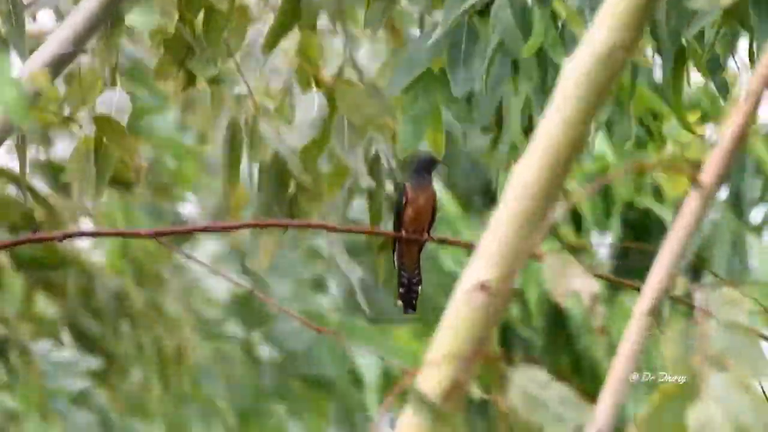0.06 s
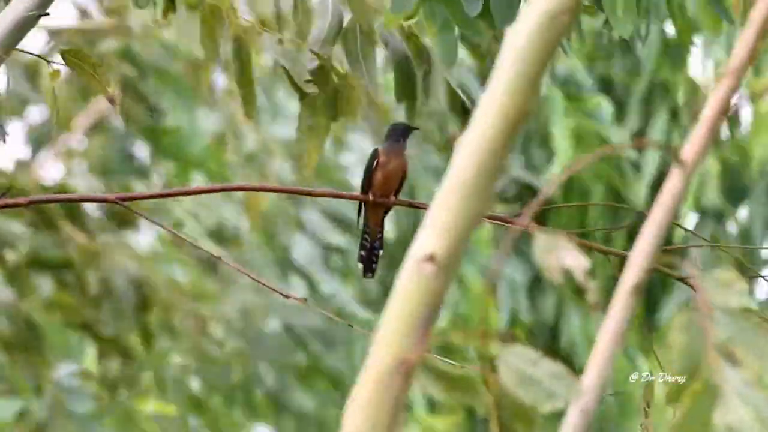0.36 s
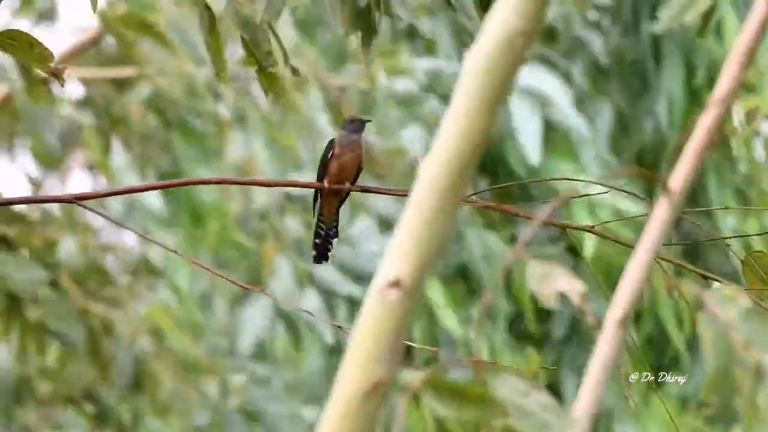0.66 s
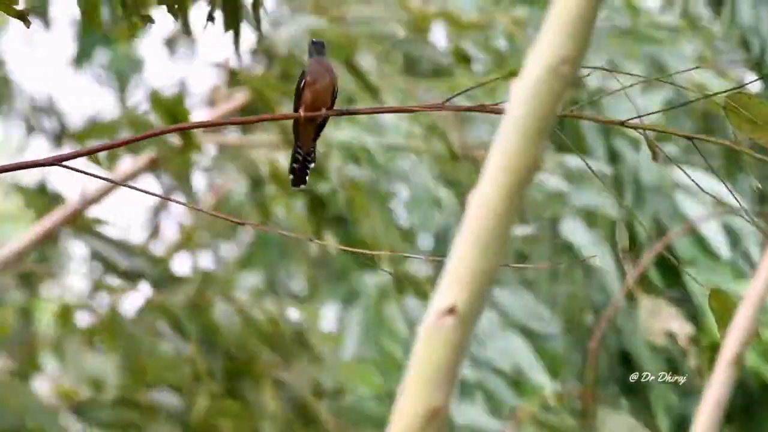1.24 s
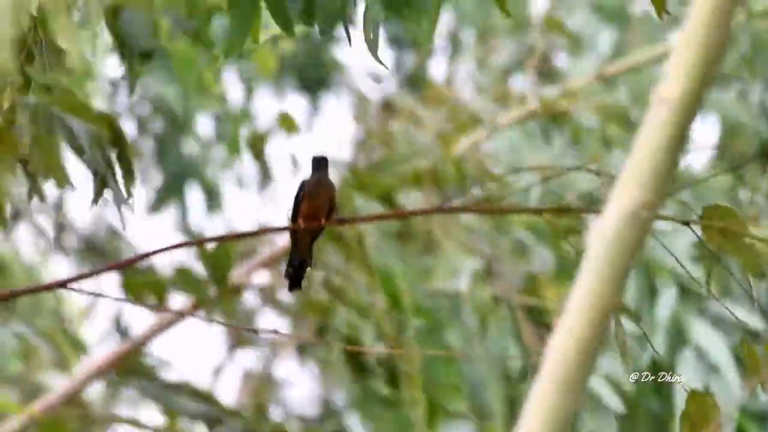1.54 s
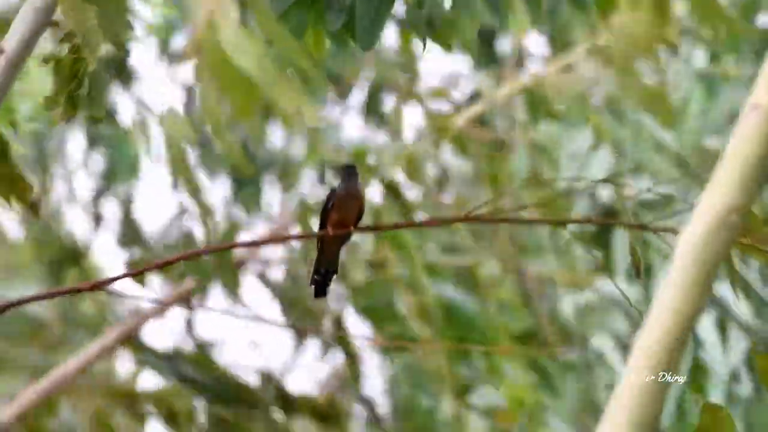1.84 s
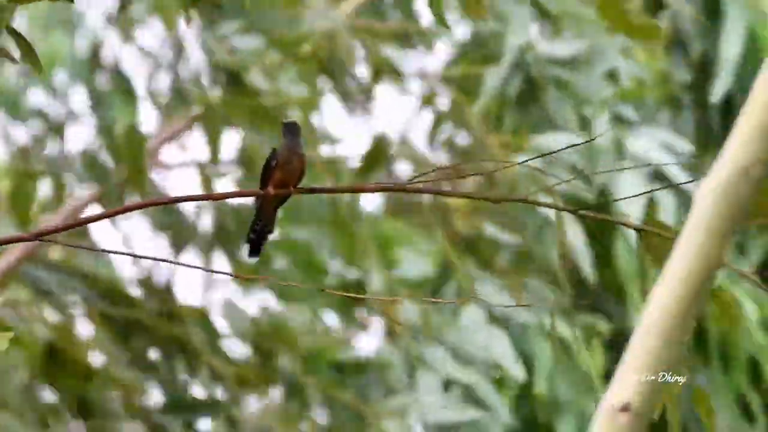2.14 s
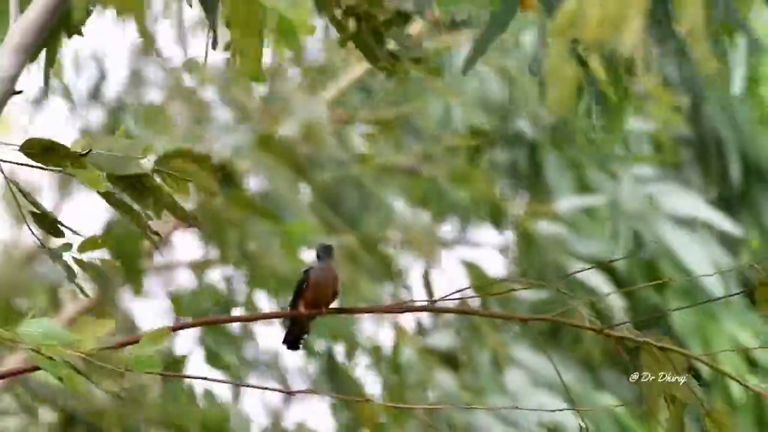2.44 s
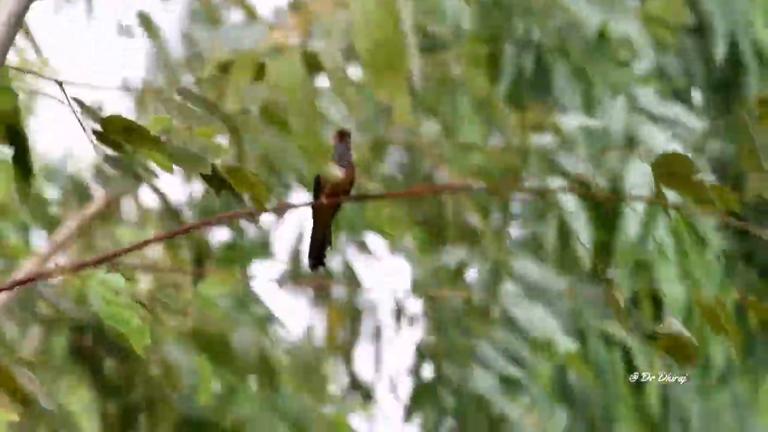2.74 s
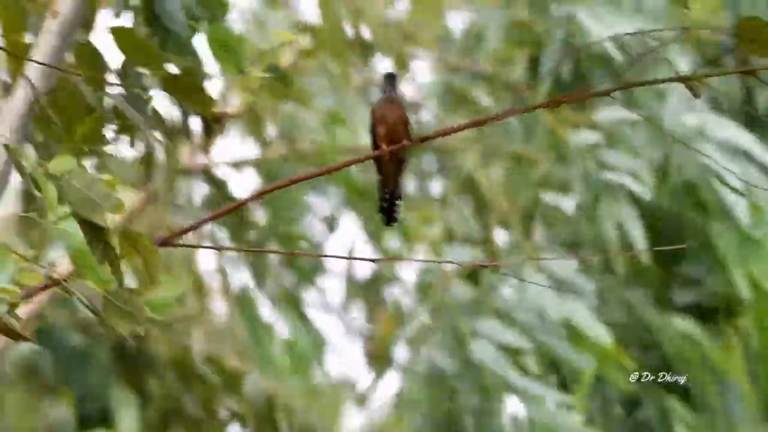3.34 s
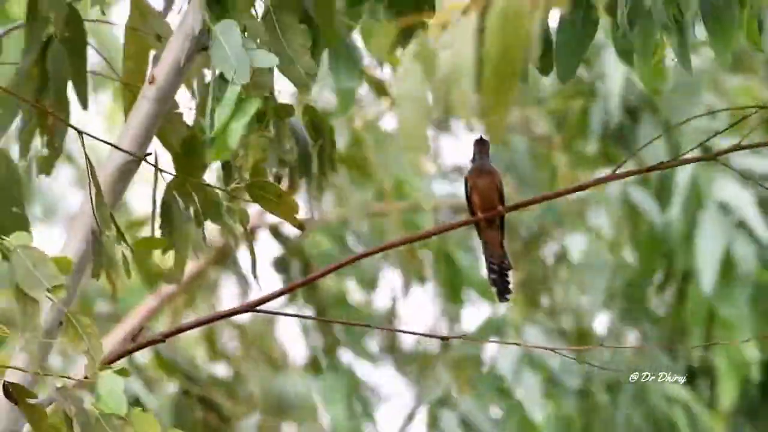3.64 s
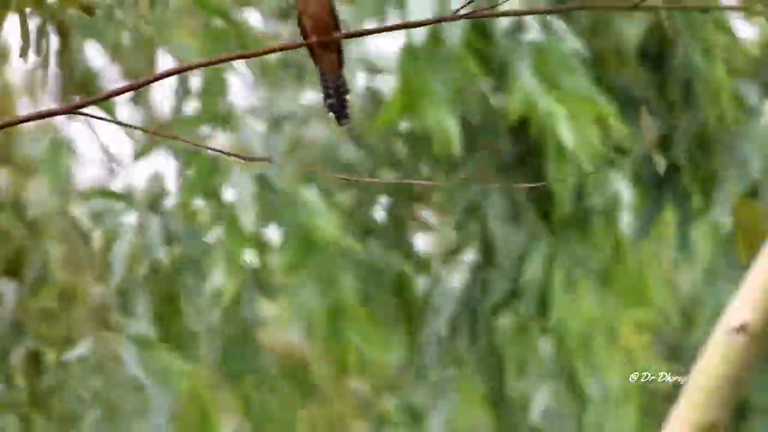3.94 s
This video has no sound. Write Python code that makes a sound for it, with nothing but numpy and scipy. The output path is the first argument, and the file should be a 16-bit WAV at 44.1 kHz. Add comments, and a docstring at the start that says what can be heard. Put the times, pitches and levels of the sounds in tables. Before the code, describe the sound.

Two clear bird whistles sound over hissing leaves and growing gusts of wind.

```python
"""Cuckoo in a windy wood

A cuckoo whistles two clear notes that dip, rise and sag, echoing in the trees, and faint
whistles come from further off. Leaves hiss, insects shrill and a few dry ticks sound close by.
Swirls of wind buffet the left and right microphones in puffs, harder towards the end."""
import sys
import numpy as np
from scipy import signal
from scipy.fft import rfft, irfft, next_fast_len
from scipy.io import wavfile
from scipy.ndimage import uniform_filter1d, map_coordinates

SR = 44100
rng = np.random.default_rng(int(sys.argv[2]) if len(sys.argv) > 2 else 0)


def dump(signal):
    """Clip the signal to [-1, 1] and save it as 16-bit WAV at the path in sys.argv[1]."""
    limited = np.clip(np.atleast_2d(signal).T, -1, 1)
    pcm = np.round(limited * 32767).astype(np.int16)
    wavfile.write(sys.argv[1], SR, pcm)


N = 176400  # 4 seconds
TIME_S = np.arange(N) / SR


def amp(db):
    """Turn decibels into a number to multiply a sound by."""
    return 10 ** (np.asarray(db) / 20)


def unit(x):
    """Scale a sound to an average strength (rms) of 1."""
    return x / np.sqrt(np.mean(x ** 2) + 1e-20)


def along(points, hz):
    """Read between the rows of a frequency table, giving each octave equal room."""
    row_hz, values = np.transpose(points)
    return np.interp(np.log(hz + 1), np.log(row_hz + 1), values)


def curves(rows):
    """Join the rows of a time table with straight lines: one curve per column after the time."""
    times, *columns = np.transpose(rows)
    return [np.interp(TIME_S, times, column) for column in columns]


def wobble(per_s):
    """A smooth curve through this many random values a second."""
    return map_coordinates(rng.standard_normal(4096), [TIME_S * per_s], mode="wrap")


def pan(db):
    """Left and right gains that make the left side louder by db."""
    return amp(np.array([[db], [-db]]) / 2)


def filtered(x, response):
    """Multiply each frequency in a sound by response(hz)."""
    size = next_fast_len(N + SR // 2)
    return irfft(rfft(x, size) * response(np.fft.rfftfreq(size, 1 / SR)), size)[..., :N]


def lead(x, seconds):
    """Let a sound reach the left microphone this much earlier than the right."""
    return filtered(x, lambda hz: np.exp(1j * np.pi * hz * seconds * np.array([[1], [-1]])))


def noise(response):
    """Two unrelated noises, shaped by the same filter or by one each."""
    return unit(filtered(rng.standard_normal((2, N)), response))


# How alike the two sides sound (1 the same, 0 unrelated): frequency_hz, likeness
SIDE_LIKENESS = [(100, 1), (600, 0.82), (1500, 0.15), (3000, 0), (6000, 0), (12000, 0)]
def surrounding_noise(tone):
    """Noise from all around: alike on both sides in the bass, unrelated in the treble."""
    def response(hz):
        angle = np.arccos(np.clip(along(SIDE_LIKENESS, hz), -1, 1)) / 2
        return amp(along(tone, hz)) * [np.cos(angle), np.sin(angle)]
    shared, opposite = noise(response)
    return unit(np.array([shared + opposite, shared - opposite]))


# Tone of the leaves over a low outdoor rumble: frequency_hz, level_db
LEAF_TONE = [(24, -38), (45, -14.5), (100, -6), (180, -10.5), (330, -22), (550, -20), (1250, -20.5),
             (1650, -17), (3100, -16.5), (4700, -15.5), (5700, -13), (6300, -14), (7240, -15.5),
             (8840, -12), (9700, -18), (11100, -24.5), (14600, -32.5), (15700, -39)]
# Which side the hiss leans to: frequency_hz, left_over_right_db
LEAF_SIDES = [(100, 2.5), (1200, -1.5), (4500, 1), (7000, 2.5), (9000, -3), (13000, 1)]
# Slow rise and fall of the hiss: time_s, level_db
LEAF_LOUDNESS = [(0.0, -34.5), (0.42, -36.5), (0.91, -37), (1.16, -38), (2.06, -36.5), (3.1, -35),
                 (3.45, -35), (4.0, -35.5)]
def leaves():
    """The leaves of the whole wood blend into an even hiss."""
    hiss = surrounding_noise(LEAF_TONE)
    hiss = filtered(hiss, lambda hz: amp(along(LEAF_SIDES, hz) * np.array([[1], [-1]]) / 2))
    level_db = curves(LEAF_LOUDNESS)[0] + 2.5 + .5 * wobble(60)
    return lead(hiss, seconds=.00011) * amp(level_db)


# Rise and fall of the shrill insect: time_s, level_db
INSECT_LOUDNESS = [(0, -43), (.35, -51), (.5, -45), (.82, -38), (.97, -43), (1.04, -36), (1.2, -51),
                   (1.33, -52), (1.42, -39), (1.7, -42), (1.8, -47), (2.1, -49), (2.25, -41.5), (2.58, -44),
                   (2.66, -36), (2.75, -40), (3.15, -39.5), (3.5, -42.5), (4, -38.5)]
def insects():
    """One insect shrills in a quick trill; a higher chorus follows its swells more gently."""
    def band(centre_hz, half_width_hz):
        return noise(lambda hz: 1 / (1 + ((hz - centre_hz) / half_width_hz) ** 2))
    level_db, = curves(INSECT_LOUDNESS)
    trill_hz, trill_db = 29, 4
    trill = unit(amp(trill_db * np.sin(2 * np.pi * trill_hz * TIME_S + wobble(4.3))))
    shrill = band(centre_hz=5843, half_width_hz=47.56) * trill * amp(level_db + .3)
    chorus_db = (level_db + level_db.mean()) / 2 - 5
    chorus = band(centre_hz=9140, half_width_hz=492) * amp(chorus_db)
    return pan(-4) * shrill + pan(-4.5) * chorus


# Light rustle close by: time_s, level_db
RUSTLE_LOUDNESS = [(0, -42.5), (.3, -40.5), (.5, -52), (1.05, -46.5), (1.18, -39.5), (1.5, -41.5),
                   (1.6, -45), (1.7, -41), (1.95, -44), (2.08, -48), (2.2, -41), (2.35, -53), (4, -42)]
# Single dry ticks: time_s, level_db, left_over_right_db
DRY_TICKS = [(0.0362, -21, 1.5), (0.146, -23, 6), (0.1719, -29, 6), (0.2827, -24, 6), (1.1701, -24.5, 9),
             (1.2942, -22.5, 4.5), (1.3223, -30, 6), (1.461, -22.5, 8), (1.6724, -23, 4),
             (1.6978, -28.5, 10), (1.8643, -22, 2.0), (1.892, -25.5, 7), (2.1849, -22, 5.5),
             (2.2097, -28, 3)]
# Tone of both ticks and rustle: frequency_hz, level_db
TICK_TONE = [(200, -9), (600, -0.5), (1300, 0.5), (2000, -5.5), (2800, 4), (4200, 1.5), (5200, 4.5),
             (7500, -2), (10000, -11), (15000, -28)]
def ticks():
    """Short dry scuffs stand out of a light rustle nearby."""
    rise_s, fade_s = .0029, .026  # a tick fades by 60 dB in fade_s
    loudness = amp(curves(RUSTLE_LOUDNESS)[0] + 1.66 * wobble(45)) * pan(2)
    for time_s, level_db, side_db in DRY_TICKS:
        age_s = np.maximum(TIME_S - time_s + rise_s, 0)
        rise = 1 - np.exp(-age_s / rise_s)
        fade = amp(level_db + 2.5 - 60 * age_s / fade_s)
        loudness += pan(side_db) * rise * fade
    return loudness * surrounding_noise(TICK_TONE)


# Steady push of the wind on each microphone: time_s, level_db
LEFT_PUSH = [(0, -38), (0.129, -49), (0.298, -34.5), (.7, -31.5), (0.951, -43), (1.271, -47.5), (1.45, -39),
             (1.761, -33), (1.929, -45), (2.2, -37), (2.621, -37.5), (2.85, -29), (3.08, -38.5),
             (3.3, -22.5), (3.37, -23.5), (3.56, -14), (3.68, -13.5), (3.76, -30.5), (3.88, -38.5),
             (4, -26.5)]
RIGHT_PUSH = [(0, -42.5), (.06, -24.5), (.2, -50), (0.902, -46.5), (1.001, -30.5), (1.099, -46.5),
              (1.55, -47), (1.85, -33), (1.98, -46.5), (2.35, -45), (2.51, -27), (2.699, -47), (2.819, -17),
              (2.951, -26), (3.1, -43.5), (3.25, -32), (3.481, -37), (3.591, -14.5), (3.719, -15),
              (3.77, -27), (4, -27.5)]
# Single puffs: peak_s, level_db, length_s, side (0 left, 1 right), brightness (multiplies swirl speed)
WIND_PUFFS = [(.313, -27.5, 0.014, 0, 1), (0.39, -25, 0.015, 0, 0.95), (0.447, -20, 0.02, 0, 1.24),
              (.515, -28, 0.028, 0, 0.99), (0.631, -23.5, 0.018, 0, 1.03), (0.674, -13, 0.013, 0, 0.82),
              (.725, -15, .015, 0, 1.35), (0.828, -25.5, .034, 0, 0.9), (1.385, -19, 0.023, 0, 0.99),
              (1.594, -27, 0.019, 0, 0.9), (1.647, -25, .013, 0, 1), (1.679, -18.5, .02, 0, 1.076),
              (1.783, -21.5, 0.026, 0, .9), (1.81, -21, 0.0119, 0, 1.09), (2.136, -17, .025, 0, 1.106),
              (2.215, -14.5, 0.019, 0, .75), (2.326, -19, .012, 0, 1.03), (2.454, -19, 0.023, 0, 1.46),
              (2.505, -20.5, 0.027, 1, 0.89), (2.524, -24.5, .023, 0, 1), (2.58, -27, .016, 0, 1.016),
              (2.691, -21, .015, 0, 0.77), (2.772, -14.5, 0.048, 0, 0.87), (2.813, -5.5, 0.023, 1, 1.48),
              (2.785, -15, .008, 1, 1.57), (2.856, -10.5, .012, 1, 1.6), (2.903, -13.5, 0.018, 0, 0.8),
              (2.93, -17, 0.014, 1, 1), (2.979, -17, 0.028, 0, 1.07), (3.042, -22.5, 0.017, 1, .9),
              (3.152, -16.5, 0.023, 0, 0.78), (3.195, -20, 0.018, 1, 1.05),
              (3.233, -12.5, 0.01826, 0, 0.79), (3.283, -16, 0.021, 0, 1.173),
              (3.432, -12, 0.023, 0, 1.194), (3.467, -17, 0.015, 0, 1.48), (3.514, -10.5, .011, 0, 1.87),
              (3.538, -4.5, .014, 0, 0.87), (3.569, -7, 0.013, 1, 1.61), (3.619, -6, 0.013, 0, 0.59),
              (3.725, -14.5, 0.018, 1, 1), (3.783, -17.5, 0.01356, 0, 1), (3.953, -16.5, 0.0099, 0, 0.86),
              (3.973, -7, .012, 0, 1.43)]
# Rumble of the swirling air at speed 1: frequency_hz, level_db
SWIRL_TONE = [(14, -42), (28, -21), (48, -8), (78, 2.5), (110, 7), (170, 4), (300, -8), (500, -19),
              (800, -31.5), (1400, -52), (3000, -56), (8000, -100)]
def wind():
    """Swirls of air sweep over each microphone; a stronger flow is louder, faster and so brighter."""
    side_speeds, reference_flow = (1.08, .88), amp(-20)
    rumbles = noise(lambda hz: amp(along(SWIRL_TONE, hz)))
    sides = []
    for side, (push, rumble) in enumerate(zip((LEFT_PUSH, RIGHT_PUSH), rumbles)):
        power = bright_power = amp(curves(push)[0] + 4.5 * wobble(55)) ** 2
        for peak_s, level_db, length_s, puff_side, brightness in WIND_PUFFS:
            if puff_side == side:
                puff = amp(level_db) ** 2 * .5 ** ((2 * (TIME_S - peak_s) / length_s) ** 2)
                power = power + puff
                bright_power = bright_power + brightness * puff
        flow = np.sqrt(power)
        speed = side_speeds[side] * (flow / reference_flow) ** .14 * bright_power / power
        speed *= np.exp(.33 * wobble(190))  # the air moves unevenly
        # Partly even out the rumble's own swells, so the puffs stand out.
        swell = np.abs(uniform_filter1d(uniform_filter1d(rumble ** 2, size=600), size=200)) + 1e-6
        even_rumble = unit(rumble / swell ** .35)
        # Play the rumble faster or slower as the speed changes.
        sides.append(flow * map_coordinates(even_rumble, [np.cumsum(speed)], mode="wrap"))
    return amp(-1) * np.array(sides)


def tree_echo(song):
    """Echoes scattered by trunks and leaves build up and die away."""
    build_s, fade_s = .03, .63  # the echo fades by 60 dB in fade_s
    age_s = TIME_S[:SR]
    tail = rng.standard_normal((2, SR)) * amp(-60 * age_s / fade_s) * (1 - np.exp(-age_s / build_s))
    return signal.fftconvolve(song[None], tail / np.linalg.norm(tail[0]), axes=1)[:, :N]


def whistle(note):
    """One bird note: an almost pure tone that glides in pitch and wavers slightly."""
    edge_s, flutter_db, overtone_db = .005, 1.33, -29
    pitch_hz, level_db = uniform_filter1d(np.array(curves(note)), size=400, axis=1)
    phase = 2 * np.pi * np.cumsum(pitch_hz * (1 + .002 * wobble(120))) / SR
    tone = np.sqrt(2) * (np.sin(phase) + amp(overtone_db) * np.sin(2 * phase))
    start_s, end_s = note[0][0], note[-1][0]
    on_off = np.clip(np.minimum(TIME_S - start_s, end_s - TIME_S) / edge_s + .5, 0, 1)
    return on_off * amp(level_db + flutter_db * wobble(70)) * tone


# Three distant whistles, one list each: time_s, pitch_hz, level_db
FAR_NOTES = [
    [(.22, 2366, -38), (.29, 2503, -49), (.335, 2590, -35), (.39, 2650, -50), (.435, 2795, -35.5),
     (.48, 2806, -41)],
    [(1.09, 3070, -46), (1.19, 3020, -45), (1.32, 3067, -52.5)],
    [(1.755, 2510, -45.5), (1.79, 2567, -29), (1.83, 2603, -52), (1.88, 2790, -44), (1.97, 2907, -48)],
]
def far_bird():
    """Faint whistles fade in and out on the wind, with plenty of echo."""
    song = sum(whistle(note) for note in FAR_NOTES) * amp(3 * wobble(29.95))
    return pan(-12) * amp(-10) * (song + amp(1) * tree_echo(song))


# The cuckoo's two notes, one list each: time_s, pitch_hz, level_db
CUCKOO_NOTES = [
    [(2.652, 2782, -44), (2.665, 2994, -31.5), (2.685, 2805, -20.5), (2.708, 2691, -26),
     (2.748, 2810, -22.5), (2.788, 2931, -18), (2.835, 2957, -23.5), (2.875, 2913, -24), (2.935, 2821, -24),
     (2.972, 2730, -26), (2.99, 2700, -29.5)],
    [(3.52, 2622, -42), (3.532, 2850, -27), (3.55, 2702, -19.5), (3.574, 2586, -19), (3.596, 2650, -16),
     (3.626, 2807, -18.5), (3.655, 2805, -19.5), (3.71, 2808, -24.5), (3.75, 2785, -20),
     (3.787, 2733, -20.5), (3.815, 2670, -36), (3.847, 2543, -31), (3.86, 2515, -43)],
]
# A quick bounce off something nearby, left row then right row: delay_s, level_db
NEAR_BOUNCES = [(.0047, -12.5), (.0083, -14.5)]
def cuckoo():
    """The near bird's song arrives directly, then as a quick bounce, then as an echo from the trees."""
    song = amp(-1.5) * sum(whistle(note) for note in CUCKOO_NOTES)
    direct = lead(song, seconds=.00004)
    bounce = np.array([amp(level_db) * filtered(song, lambda hz: np.exp(-2j * np.pi * hz * delay_s))
                       for delay_s, level_db in NEAR_BOUNCES])
    return pan(-4.5) * (direct + bounce) + amp(-12) * tree_echo(song)


def scene():
    """Add up everything that reaches the two microphones."""
    return cuckoo() + far_bird() + wind() + leaves() + ticks() + insects()


def record(dry):
    """The hardest puffs overload the microphones softly, and the highest treble is cut off."""
    ceiling, top_hz = .85, 15750
    rounded = dry / (1 + np.abs(dry / ceiling) ** 6) ** (1 / 6)
    return filtered(rounded, lambda hz: hz < top_hz)


dry = scene()
out = record(dry)
dump(out)
```